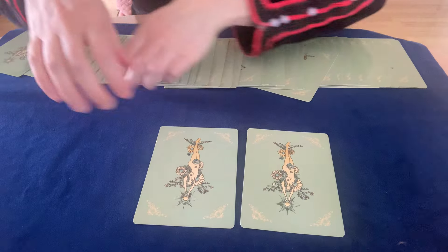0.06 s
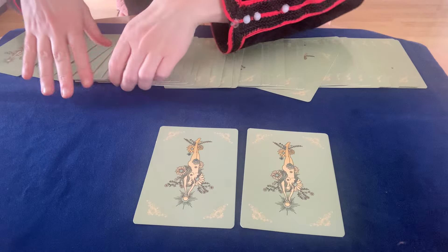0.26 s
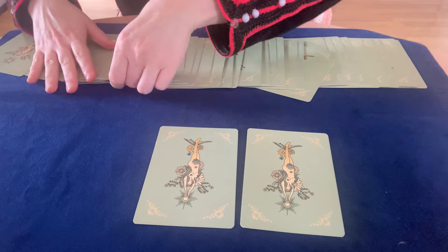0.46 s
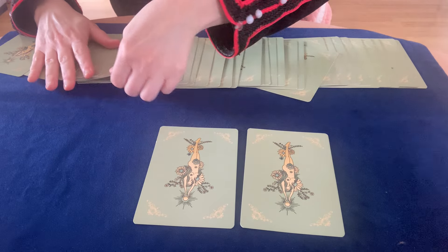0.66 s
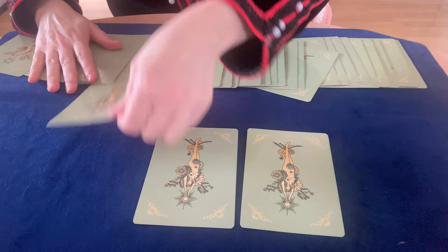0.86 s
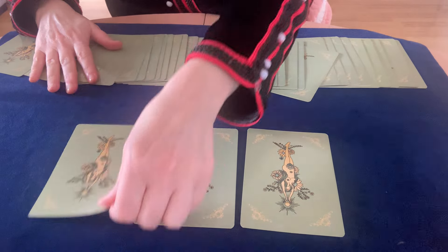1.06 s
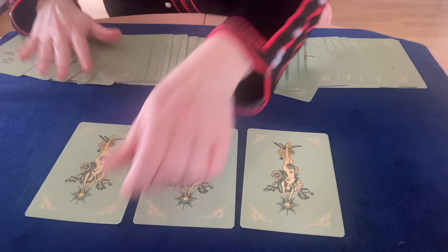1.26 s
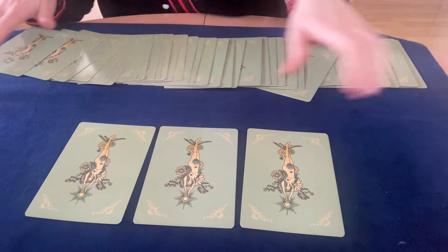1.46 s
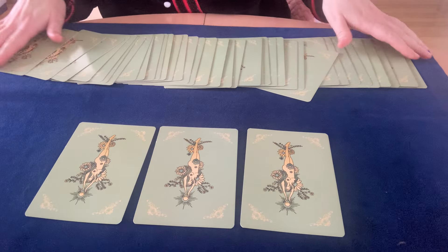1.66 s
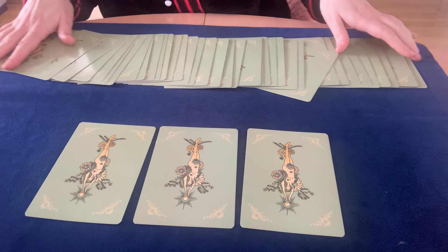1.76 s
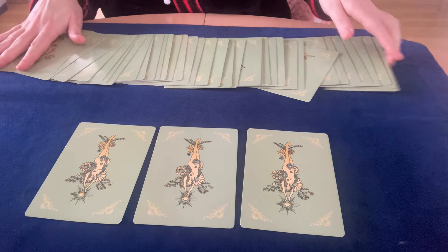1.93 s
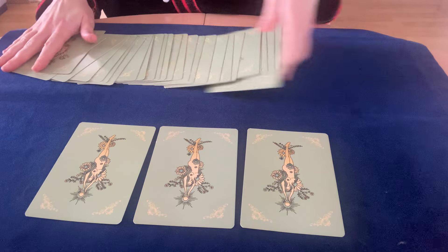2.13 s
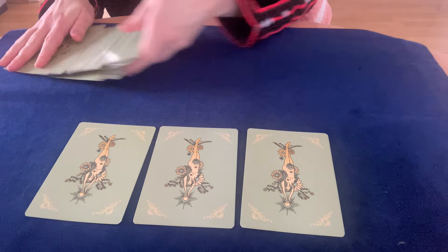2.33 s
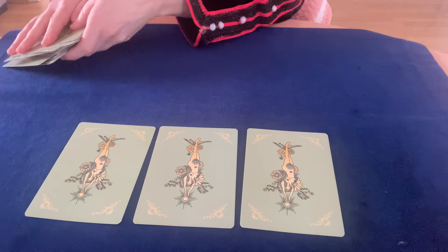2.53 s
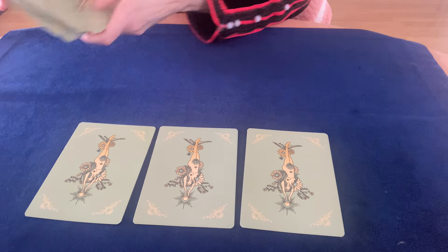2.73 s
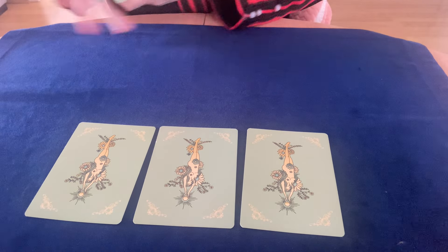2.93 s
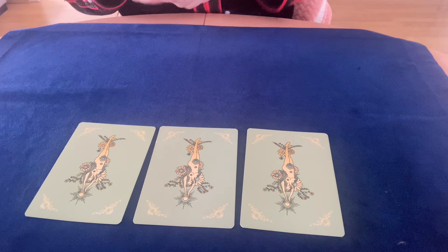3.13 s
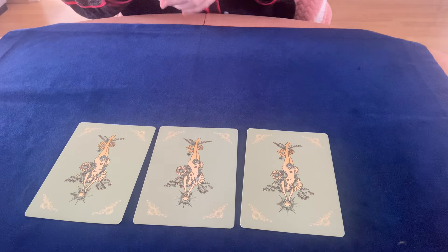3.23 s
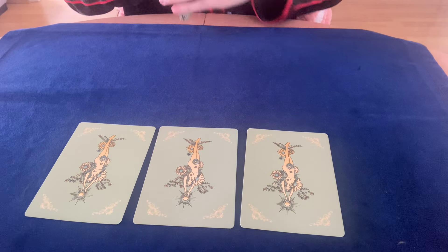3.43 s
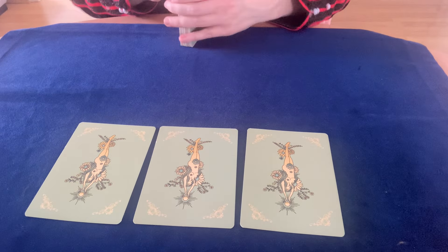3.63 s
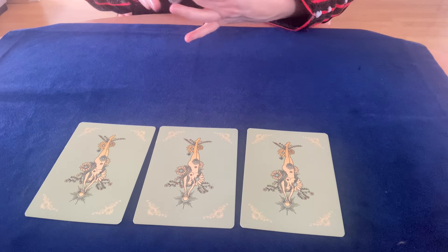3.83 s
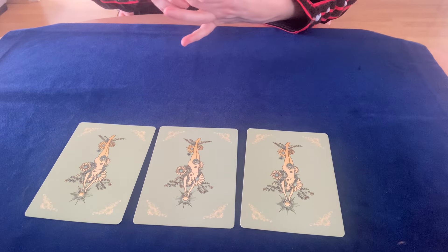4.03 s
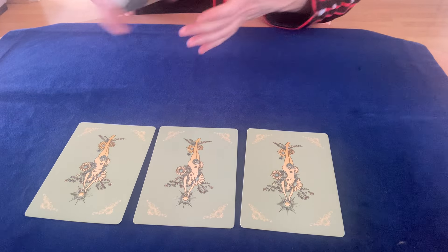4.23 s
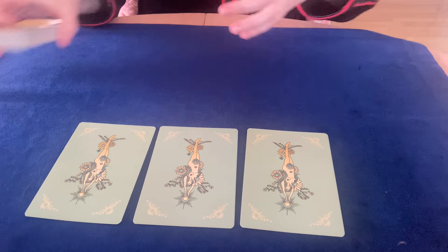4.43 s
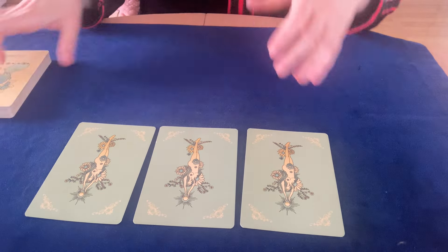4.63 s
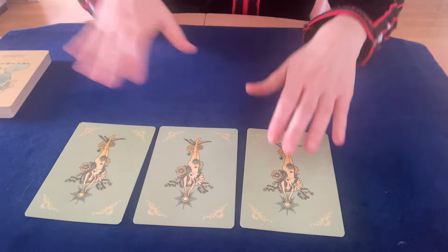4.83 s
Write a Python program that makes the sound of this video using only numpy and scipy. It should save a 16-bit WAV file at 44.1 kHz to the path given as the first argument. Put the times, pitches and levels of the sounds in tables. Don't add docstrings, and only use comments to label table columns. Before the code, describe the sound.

Close stereo pickup of large stiff cards on a cloth-covered wooden table in a small quiet room, with soft low rumble from leaning hands and a faint distant fan hum throughout. Hands rustle softly at first; at 0.43 s a card slides out with a sharp click and light knock. Brief scrapes and flaps at 0.65 and 0.9 s lead to a bright, hard snap at 1.15 s. Small ticks and gentle cloth rubbing follow. From about 2.1 to 2.6 s the spread is swept together in a steady papery hiss. Light rustles, ticks and a soft flap come around 2.9-3.3 s. At 3.58 s a rapid cluster of woody knocks squares the deck. A faint tap at 4.03 s, then a crisp clack with dull thuds at 4.6 s as the deck is put aside. Soft hand rustling continues, with a faint edge snap at 6.07 s, fading into quiet.

```python
import sys
import numpy as np
from scipy import signal
from scipy.fft import rfft, irfft, next_fast_len
from scipy.io import wavfile

SR = 44100
rng = np.random.default_rng(int(sys.argv[2]) if len(sys.argv) > 2 else 0)


def boost_factor(decibels):
    exponent = np.asarray(decibels, float) / 20
    return 10 ** exponent


def bounce(signal):
    frames = np.transpose(np.atleast_2d(signal))
    limited = np.clip(frames, -1, 1)
    pcm = np.round(limited * 32767).astype(np.int16)
    wavfile.write(sys.argv[1], SR, pcm)


N = 290213

# (time [s], peak [dB], pitch [Hz], treble [dB], left-right [dB])
EDGE_CRACKS = [
    (0.4342, -22, 1920, -5.5, 3),
    (1.1533, -16, 3130, -2, 0.5),
    (3.5925, -37, 2300, -39, -1.5),
    (3.5989, -30.5, 2290, -24, -20.5),
    (4.5956, -19, 3300, -20.5, -2.5),
    (6.0724, -33, 3520, -8, -4),
    (6.076, -43.5, 1550, -9, -3),
]
# (time [s], peak [dB], pitch [Hz], treble [dB], left-right [dB])
CORNER_TICKS = [(1.4117, -57, 1905, -31, -3), (1.6531, -59, 2400, -29, -1), (2.0809, -41, 1900, -12, -1.5),
                (2.8759, -51.5, 1510, -34.5, -2), (2.9178, -49.5, 3700, -12.5, -4.5),
                (2.96, -53, 2500, -15.5, -9), (2.9896, -46.5, 1990, -17, 2.5), (4.0295, -60, 1200, -9.5, 5),
                (4.9546, -56, 1970, -23, -2), (5.2126, -61, 1600, -15.5, -5.5),
                (5.8102, -62.5, 2450, -9, 1)]
# (time [s], peak [dB], pitch [Hz], treble [dB], length [s])
CARD_FLAPS = [(0.253, -56, 2045, -19, 0.062), (0.2975, -52, 1800, -25, 0.011),
              (0.4233, -31, 4070, -11, 0.0078), (0.4267, -30.5, 1973, -11.5, 0.0036),
              (0.6604, -34.5, 3690, -18.5, 0.0064), (0.6609, -36, 1934, -30.5, 0.0058),
              (0.6706, -41.5, 2400, -11, 0.0052), (0.909, -30, 3202, -6, 0.0063),
              (1.1528, -17.5, 5250, -13, 0.0012), (3.061, -43, 3860, -26, 0.03),
              (3.22, -54.5, 2500, -7, 0.0033), (3.5743, -35, 1600, -24, 0.013),
              (4.583, -48, 1780, -7.5, 0.018), (4.604, -41.5, 2740, -12, 0.032),
              (5.083, -53.5, 3260, -26, 0.012)]
# (time [s], peak [dB], contact pitch [Hz], thump [dB], cavity [dB])
CARD_KNOCKS = [
    (0.4348, -30.5, 490, -29, -28),
    (0.9132, -38.5, 1100, -17, -5.5),
    (1.1533, -31, 600, -25, -8),
]
# (time [s], peak [dB], contact pitch [Hz], thump [dB], cavity [dB])
DECK_KNOCKS = [(0.4255, -33, 740, -8.5, -1), (2.127, -45.5, 300, -16, -25), (2.984, -58.5, 200, 20.5, -29),
               (3.06, -49, 200, 3, -21), (3.218, -51, 300, -7.5, -21), (3.577, -27, 900, -22, -21),
               (3.583, -18.5, 300, -19, -18.5), (3.5915, -20.5, 700, -6.5, -3),
               (3.597, -21.5, 900, -15, 6.5), (3.607, -24, 501, 2.5, -24), (4.028, -52, 700, -13, -16),
               (4.5966, -29, 450, -6, -14), (4.604, -26.5, 496, -8, -24), (4.608, -23, 306, -4, -21.5)]
# (pitch [Hz], level [dB], t60 [s])
TABLE_MODES = [(247.7, -3, 0.084), (341, -4.5, 0.037), (389.4, -6.5, 0.022), (463, -1, 0.036),
               (568, -8, .04), (625, -10.5, 0.081), (737, -5.5, 0.048), (863.5, -6, 0.031),
               (904, -13.5, 0.07), (1010, -3, 0.014), (1088, -9, .06), (1422, -9.5, 0.09),
               (1805, -11.5, 0.027), (2020, -3, 0.034), (2610, -12.5, 0.025), (3160, -18, .02)]
# (time at full speed [s], held [s], rustle [dB], hiss over rustle [dB], fading [dB/s])
CARD_SLIPS = [(.165, .01, -80, 9, 200.5), (.4, 0.029, -69, 2, 302), (.46, 0.0067, -57, -0.5, 184),
              (.63, 0.09, -64, -8.5, 303), (.765, .005, -45, 0, 304), (.79, .075, -52, -2, 280),
              (.865, 0.024, -49.5, 4, 227), (1.19, 0.018, -63, -0.5, 146), (1.525, .005, -78.5, 9.5, 501.5),
              (2.7, 0.012, -78.5, 7.5, 138), (3.232, 0.0087, -60.5, 10.5, 150), (3.3, 0.049, -66.5, 4, 450),
              (3.55, 0.033, -77, 9, 298), (3.588, 0.0049, -68.5, 14.5, 238),
              (4.028, 0.0026, -75.5, -0.5, 805), (4.122, .028, -75.5, 6, 400.5),
              (4.535, 0.0032, -84, 7.5, 799), (4.6, 0.0057, -62.5, 0.5, 240),
              (4.958, 0.0036, -67, -11, 300), (5.085, .004, -62, -14, 700), (5.81, .003, -75, 2, 706.5),
              (6.09, .17, -72.5, -1.5, 300)]
# (time at full speed [s], held [s], rustle [dB], hiss over rustle [dB], fading [dB/s])
CLOTH_SWEEPS = [(.13, 0.13, -70, -9.5, 57), (1.0, 0.18, -69, -7, 97), (1.4, 0.11, -80, -10, 57),
                (1.82, 0.009, -70.5, 2.5, 110), (2.1, .445, -62, 4, 300), (2.63, 0.062, -72.5, -3, 85),
                (2.97, 0.15, -62, 2.5, 150.5), (5.05, 0.18, -69, 0.5, 88), (5.49, 0.028, -72, 1, 90),
                (5.9, 0.19, -79.5, -5, 100.5), (6.54, .02, -72.5, -3, 109.5)]
# (frequency [Hz], level [dB per Hz])
HISS_SPECTRUM = [(4000, -12.5), (5500, -9.5), (7000, -5), (9000, 0.5), (12000, -2.5), (14500, -5),
                 (16000, -7.5)]
RUSTLE_SPECTRUM = [(900, -16), (1500, -6.5), (2200, -3.5), (3500, -3.5), (4800, -5.5), (6500, -21)]
DRAG_SPECTRUM = [(250, -14), (450, 2), (800, -2), (1400, -6), (2200, -17)]
# (time [s], level [dB])
LEAN = [(0, -70.5), (.1, -61), (.33, -64), (.66, -71), (.8, -78), (1.1, -90.5), (1.3, -71.5), (1.75, -86),
        (2.0, -74.5), (2.13, -64), (2.53, -68.5), (2.8, -77), (2.89, -66.5), (3.15, -67.5), (3.45, -68.5),
        (4.3, -84), (4.85, -67.5), (6.58, -73)]
# (time [s], level [dB])
WRIST_BUMPS = [
    (.1, -47),
    (.33, -48),
    (1.299, -57),
    (2.15, -48.5),
    (3.1, -51.5),
    (3.219, -50.5),
    (5.19, -52.5),
    (6.201, -57.5),
]
# (centre [Hz], t60 [s], level [dB])
ROOM_BANDS = [(81.1, 0.28, 1.5), (270, 0.51, 3.5), (600, 0.52, 4), (1200, 0.51, 6), (2400, 0.4, 5.5),
              (4440, 0.24, 1), (9400, 0.12, 3.5)]
# (frequency [Hz], left-right likeness [0..1])
SIDE_LIKENESS = [(60, 0.99), (290, 0.82), (640, 0.18), (1400, 0.22), (4000, 0.067)]
# (frequency [Hz], level [dB per Hz])
RUMBLE_SPECTRUM = [(13, -37.5), (22, -10), (43, 0.5), (81, -3), (188, -1.5), (204, -6), (222, -10),
                   (284, -8.5), (318, -12), (425, -11.5), (488, -25), (600, -23.5), (780, -42),
                   (1320, -120)]
AIR_SPECTRUM = [(300, 1.5), (600, -3.5), (1400, 0.5), (2500, -10.5), (3200, -3.5), (5000, -16.5),
                (9000, -12.5), (15000, -17)]
# (pitch [Hz], level [dB], width [Hz])
FAN_TONES = [(49, -66, 2.6), (149.3, -63.5, 4.4), (198.1, -59, 5.9), (397, -88, 3.1), (596, -83.5, 1.7)]


def band_pass(x, order, low_hz, high_hz):
    return signal.sosfilt(signal.butter(order, [low_hz, high_hz], "band", fs=SR, output="sos"), x)


def snaps(rows, crackle):
    size = 2048
    ring_db, ring_q, airy_db = 9, 6.0, -8.5
    lag_samples_per_db = 2.65
    out, t_s = np.zeros((3, N + size)), np.arange(size) / SR
    click = np.eye(1, size)[0]
    grit = rng.standard_normal((len(rows), size))
    for (time_s, peak_db, hz, treble_db, length_s, pan_db), noise in zip(rows, grit):
        burst = crackle * noise * swell(t_s, length_s)
        burst[int(length_s * SR / 4)] += 1

        card = band_pass(burst, 3, hz * 0.5, hz * 1.85)
        card += boost_factor(ring_db) * signal.lfilter(*signal.iirpeak(hz, ring_q, fs=SR), card)
        edge = band_pass(burst, 2, 5000, 9000) + boost_factor(airy_db) * band_pass(burst, 2, 11800, 15500)
        flick = card / np.abs(card).max() + boost_factor(treble_db + 4) * edge / np.abs(edge).max()

        broad = signal.lfilter(*signal.butter(1, [hz * 0.4, hz * 2.4], "band", fs=SR), click)
        broad *= np.linalg.norm(flick) / np.linalg.norm(broad)

        left = round(time_s * SR)
        right = left + round(lag_samples_per_db * pan_db)
        out[0, left:left + size] += boost_factor(peak_db + 3 + pan_db / 2) * flick
        out[1, right:right + size] += boost_factor(peak_db + 3 - pan_db / 2) * flick
        out[2, left:left + size] += boost_factor(peak_db + 3) * broad
    return out[:, :N]


def knocks():
    card_landing_s, deck_landing_s = 0.0018, 0.0059
    thump_hz, thump_t60_s = 79.75, 0.155
    cavity_hz, cavity_t60_s = 1320, 0.016
    slap_db, slap_top_hz = 3, 3300
    scatter_db, scatter_top_ratio = 16, 3.6
    mic_low_hz = 57.4
    size, push_size = 16384, 512

    rows = [(*row, card_landing_s) for row in CARD_KNOCKS]
    rows = sorted(rows + [(*row, deck_landing_s) for row in DECK_KNOCKS])
    spots = rng.normal(0, 1, (len(rows), len(TABLE_MODES)))
    grit = rng.normal(0, 1, (len(rows), push_size))
    out, click = np.zeros((2, N + size)), np.eye(1, size)[0]
    modes = np.array([boost_factor(db) * ring(click, hz, t60_s) for hz, db, t60_s in TABLE_MODES])
    thump = ring(click, thump_hz, thump_t60_s)
    cavity = ring(click, cavity_hz, cavity_t60_s)
    for (time_s, peak_db, hz, thump_db, cavity_db, landing_s), spot, noise in zip(rows, spots, grit):
        wood = (boost_factor(2 * spot - 5) * np.sign(spot)) @ modes
        wood = signal.lfilter(*signal.butter(1, [hz * 0.34, hz * 1.5], "band", fs=SR), wood)
        wood += boost_factor(slap_db) * band_pass(click, 3, hz * 0.39, slap_top_hz)

        push = swell(np.arange(push_size) / SR, landing_s)
        gritty_push = push * noise / np.linalg.norm(push)
        slap = signal.fftconvolve(wood, gritty_push)[:size]
        body = boost_factor(thump_db) * signal.fftconvolve(thump, push / push.sum())[:size]
        body += boost_factor(cavity_db) * cavity

        at = round(time_s * SR)
        out[0, at:at + size] += boost_factor(peak_db + 3) * (slap + body)
        scatter_band = signal.butter(2, [hz * 0.25, hz * scatter_top_ratio], "band", fs=SR)
        scatter = signal.lfilter(*scatter_band, click[:512])
        out[1, at:at + 512] += boost_factor(peak_db + scatter_db) * scatter
    return signal.lfilter(*signal.butter(2, mic_low_hz, "high", fs=SR), out[:, :N])


def swell(t_s, length_s):
    quarter_s = max(length_s, 3e-4) / 4
    return t_s / quarter_s * np.exp(1 - t_s / quarter_s)


def ring(clicks, hz, t60_s):
    r, w = boost_factor(-60 / (t60_s * SR)), 2 * np.pi * hz / SR
    return signal.lfilter([0, np.sin(w)], [1, -2 * r * np.cos(w), r * r], clicks + 1e-18)


def room(x):
    first_echo_s, onset_s = 0.0065, 0.00035
    t_s = np.arange(SR // 2) / SR
    noise, tail = rng.standard_normal((2, len(t_s))), 0
    noise = irfft(spread(*rfft(noise), np.fft.rfftfreq(len(t_s), 1 / SR)), len(t_s))
    for hz, t60_s, db in ROOM_BANDS:
        tail = tail + band_pass(noise, 2, hz / 2.0, hz * 1.5) * boost_factor(db - 60 * t_s / t60_s)
    tail = tail * np.clip((t_s - first_echo_s) / onset_s, 0, 1)
    tail = tail / np.sqrt(np.sum(tail ** 2, axis=1, keepdims=True))
    return signal.fftconvolve(x[None], tail, axes=1)[:, :N]


def sliding():
    slip_hiss, slip_rustle = strokes(CARD_SLIPS, rise_db_per_s=598, pan_db=-6)
    sweep_hiss, sweep_rustle = strokes(CLOTH_SWEEPS, rise_db_per_s=124, pan_db=-5.5)
    catching_db = 1.6 * drift(25)
    hiss = np.sqrt(slip_hiss + sweep_hiss) * boost_factor(catching_db) * coloured(HISS_SPECTRUM, grain_db=0.5)
    cloth = coloured(RUSTLE_SPECTRUM, grain_db=0.0)
    card = rms_one(signal.lfilter(*signal.butter(2, 1700, "high", fs=SR), cloth[:, ::-1]))
    rustle = boost_factor(catching_db) * (np.sqrt(slip_rustle) * card + np.sqrt(sweep_rustle) * cloth)
    drag = boost_factor(in_time(LEAN)[0] + 0.56 * catching_db) * coloured(DRAG_SPECTRUM, grain_db=1.56)
    return hiss + rustle + panned(drag, np.array([-3.5]))


def strokes(rows, rise_db_per_s, pan_db):
    t_s, power = np.arange(N) / SR, 0
    for time_s, held_s, db, hiss_db, fade_db_per_s in rows:
        rise_db = rise_db_per_s * np.maximum(time_s - t_s, 0)
        fade_db = fade_db_per_s * np.maximum(t_s - time_s - held_s, 0)
        shape_db = np.maximum(db - rise_db - fade_db, -300)
        power = power + np.exp(shape_db * np.log(10) / 10) * boost_factor(np.array([[2 * hiss_db], [0]]))
    return np.array([panned(gain, np.array([pan_db])) ** 2 for gain in np.sqrt(power)])


def background():
    air_db = -77
    t_s, hum = np.arange(N) / SR, 0
    for hz, db, width_hz in FAN_TONES:
        gain = boost_factor(db + 3.0 + 1.9 * drift(width_hz))
        hum = hum + gain * np.sin(2 * np.pi * hz * t_s + 1.6 * drift(width_hz))
    rumble = rumble_gain() * coloured(RUMBLE_SPECTRUM, grain_db=2.3)
    return rumble + boost_factor(air_db) * coloured(AIR_SPECTRUM, grain_db=1.0) + hum


def rumble_gain():
    mean_db, follows, bump_s = -55.5, 0.33, 0.069
    t_s, lean_db = np.arange(N) / SR, in_time(LEAN)[0]
    bumps = sum(boost_factor(2 * db) * np.exp(-((t_s - time_s) / bump_s) ** 2) for time_s, db in WRIST_BUMPS)
    return np.sqrt(boost_factor(2 * mean_db + 2 * follows * (lean_db - lean_db.mean())) + bumps)


def coloured(spectrum, grain_db):
    size = next_fast_len(N)
    grains = rng.standard_normal((2, N)) * boost_factor(grain_db * drift(60))
    hz = np.fft.rfftfreq(size, 1 / SR)
    mid, side = rfft(grains, size) * boost_factor(at_hz(spectrum, hz, left=-82.5, right=-75.0))
    return rms_one(irfft(spread(mid, side, hz), size)[:, :N])


def spread(mid, side, hz):
    alike = np.clip(at_hz(SIDE_LIKENESS, hz), 0, 1)
    return np.sqrt(1 + alike) * mid + np.sqrt(1 - alike) * side * [[1], [-1]]


def panned(x, pan_db):
    return x * boost_factor(np.array([pan_db / 2, -pan_db / 2]))


def drift(rate_hz):
    r = np.exp(-80 * np.pi * rate_hz / SR)
    slow = signal.lfilter([1], [1, -2 * r, r * r], rng.standard_normal(N // 40 + 2002))[2000:]
    return np.interp(np.arange(N) / 40, np.arange(len(slow)), rms_one(slow))


def rms_one(x):
    return x / np.sqrt(np.mean(x ** 2) + 1e-20)


def in_time(rows):
    time_s, *columns = np.transpose(rows)
    return [np.interp(np.arange(N) / SR, time_s, column) for column in columns]


def at_hz(points, hz, **ends):
    points_hz, values = np.transpose(points)
    return np.interp(np.log(hz + 1e-9), np.log(points_hz), values, **ends)


def scene():
    crack_s, tick_s, flap_pan_db = 0.0008, 0.0047, -1
    flick_room_db, knock_room_db, ring_room_db = -13, -5, -7
    breaks = [(*row[:4], crack_s, row[4]) for row in EDGE_CRACKS]
    breaks += [(*row[:4], tick_s, row[4]) for row in CORNER_TICKS]
    flaps = [(*row, flap_pan_db) for row in CARD_FLAPS]
    *flicks, flicks_afar = snaps(breaks, crackle=0.23) + snaps(flaps, crackle=1.5)
    blows, blows_afar = knocks()
    to_room = boost_factor(flick_room_db) * flicks_afar
    to_room += boost_factor(knock_room_db) * (boost_factor(ring_room_db) * blows + blows_afar)
    return flicks + blows + room(to_room) + sliding() + background()


def low_pass(x):
    return signal.sosfilt(signal.butter(12, 16470, fs=SR, output="sos"), x)


def record(dry):
    join_hz, fully_shared_hz = 5173, 8140
    lag_s, in_step_hz = 1 / 5150, 3600
    top_hz = 15900
    size = next_fast_len(N + 512)
    hz, both = np.fft.rfftfreq(size, 1 / SR), rfft(dry, size)
    shared = np.clip((hz - join_hz) / (fully_shared_hz - join_hz), 0, 1) ** 0.3
    joined = both * np.sqrt(1 - shared) + both[0] * np.sqrt(shared)
    lagging = np.clip((hz - 4300) / 1000, 0, 1)
    turn = np.exp(1j * np.pi * (hz - in_step_hz) * lag_s * lagging * np.array([[1], [-1]]))
    stereo = irfft(joined * turn, size)[:, :N]
    mix = signal.sosfilt(signal.cheby2(10, 60, top_hz + 700, fs=SR, output="sos"), stereo)
    return low_pass(mix)


dry = scene()
out = record(dry)
bounce(out)
```